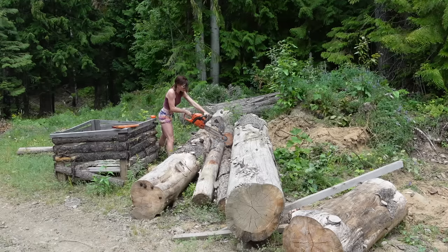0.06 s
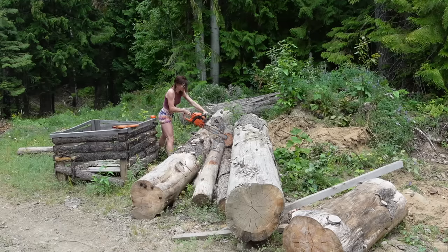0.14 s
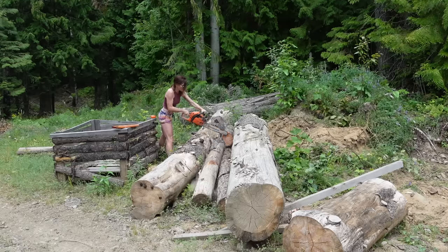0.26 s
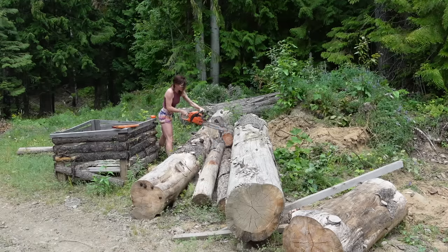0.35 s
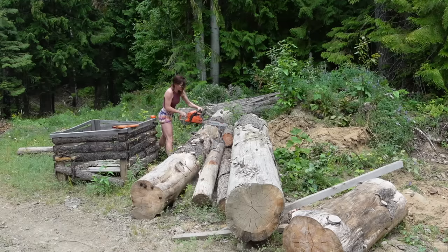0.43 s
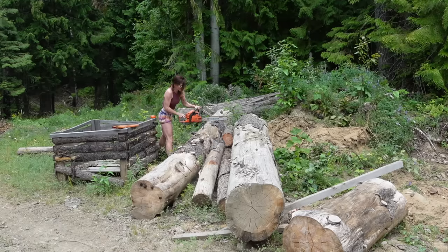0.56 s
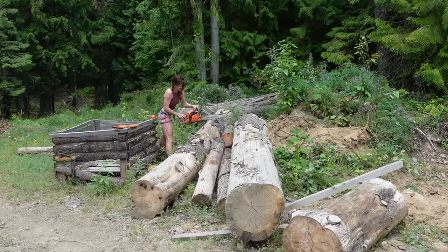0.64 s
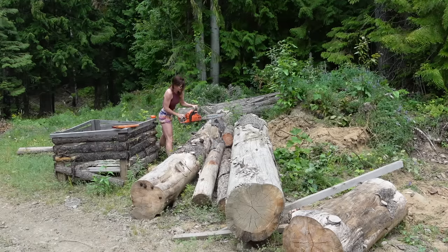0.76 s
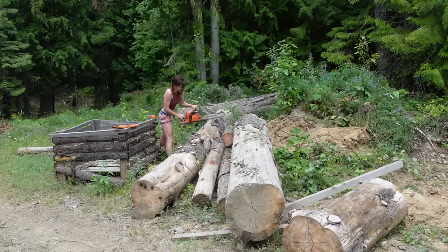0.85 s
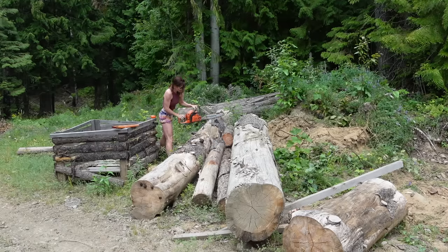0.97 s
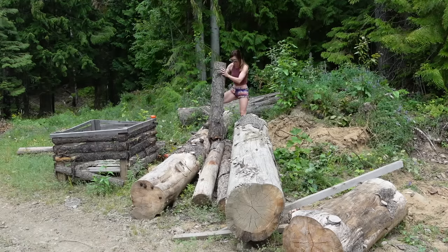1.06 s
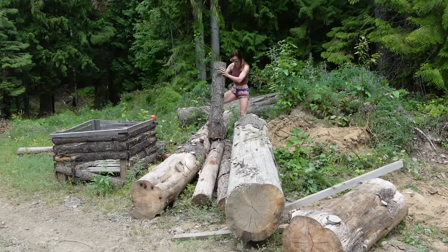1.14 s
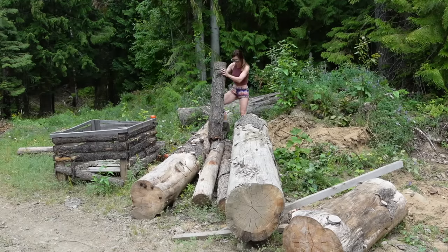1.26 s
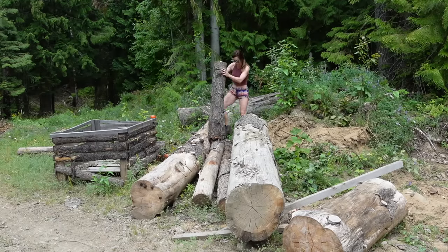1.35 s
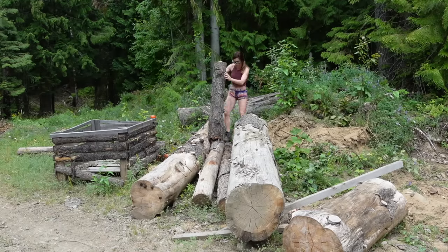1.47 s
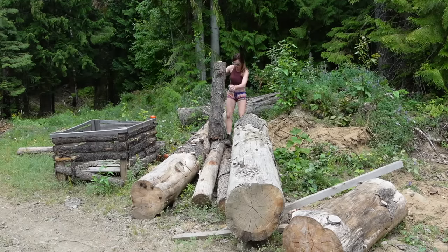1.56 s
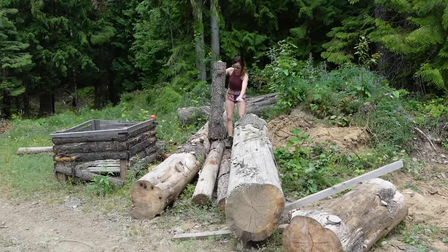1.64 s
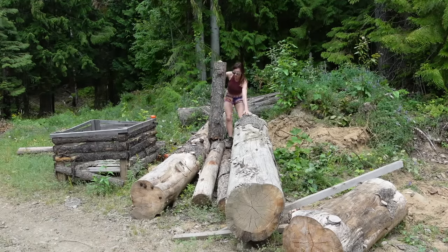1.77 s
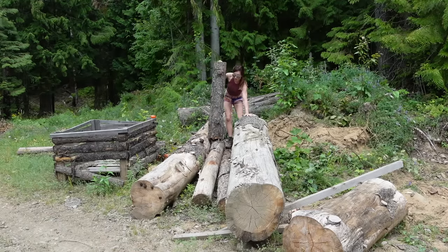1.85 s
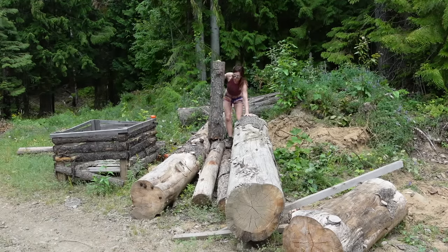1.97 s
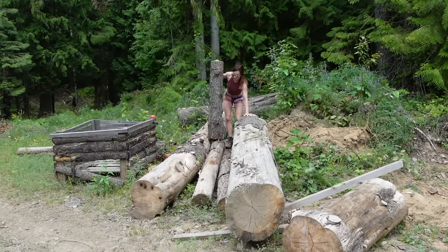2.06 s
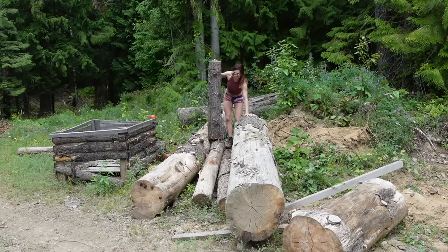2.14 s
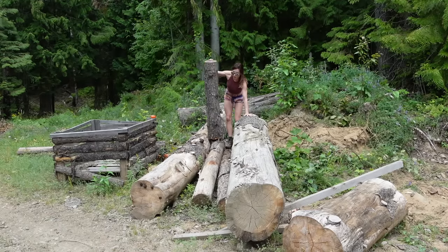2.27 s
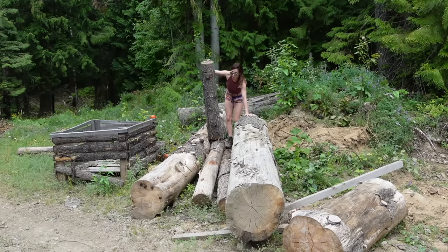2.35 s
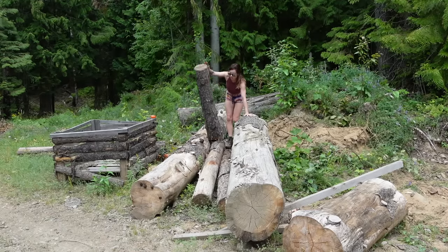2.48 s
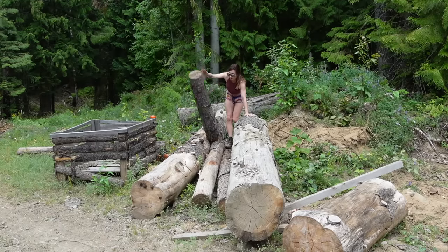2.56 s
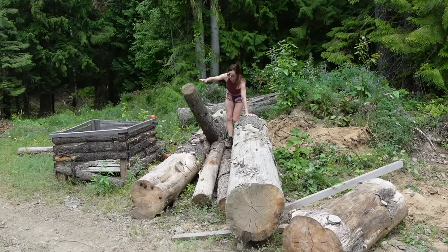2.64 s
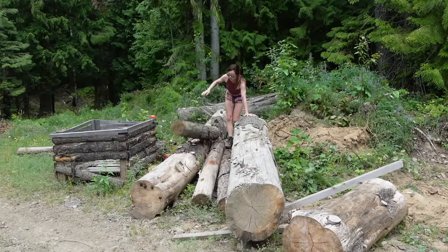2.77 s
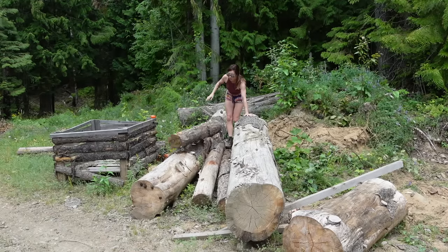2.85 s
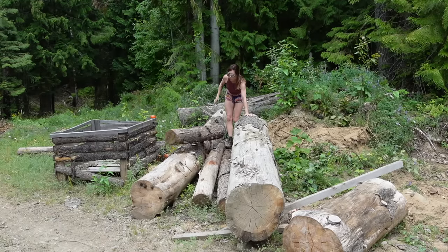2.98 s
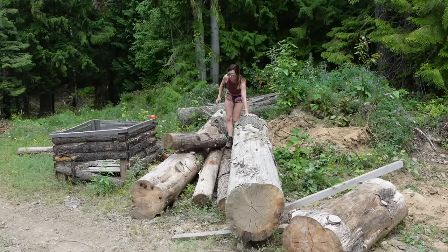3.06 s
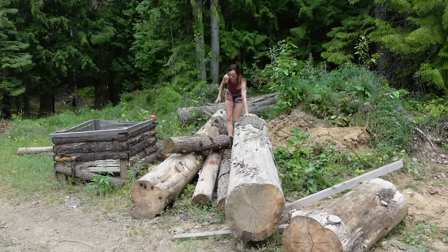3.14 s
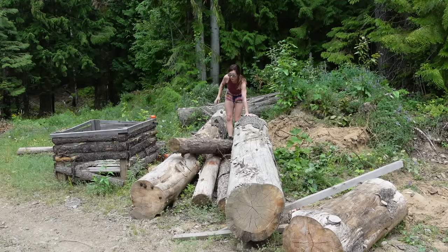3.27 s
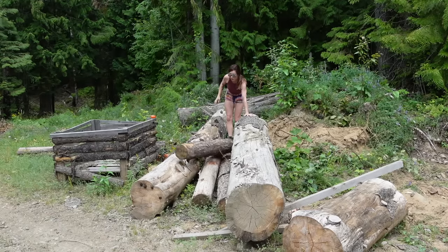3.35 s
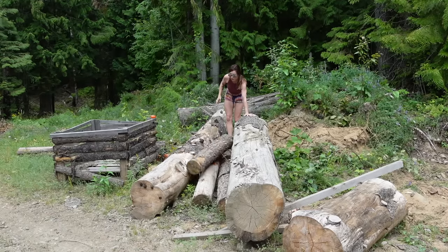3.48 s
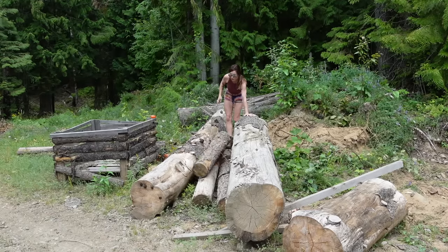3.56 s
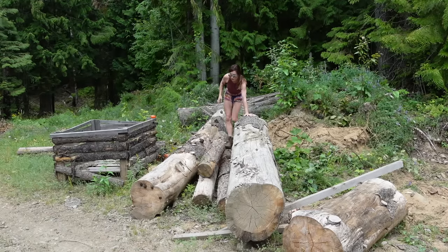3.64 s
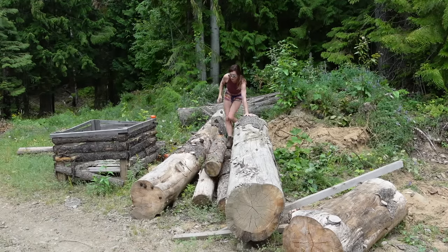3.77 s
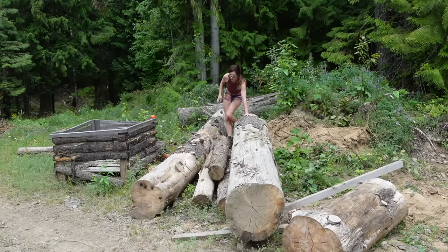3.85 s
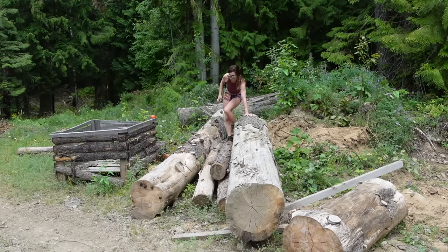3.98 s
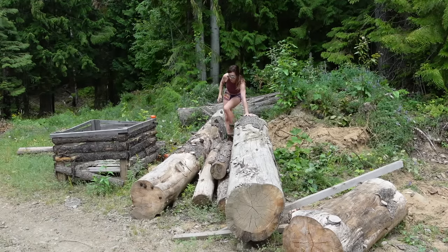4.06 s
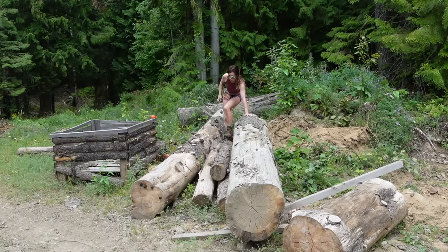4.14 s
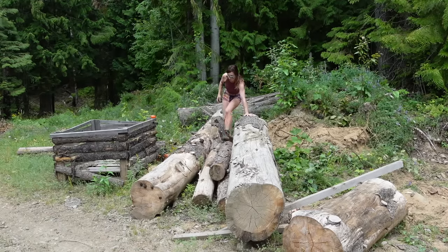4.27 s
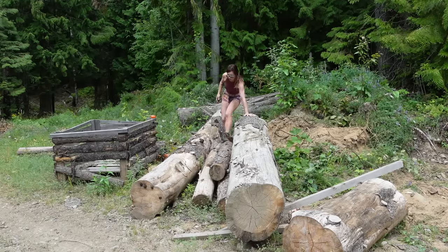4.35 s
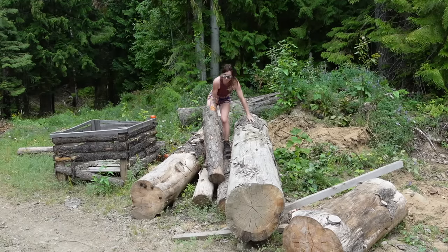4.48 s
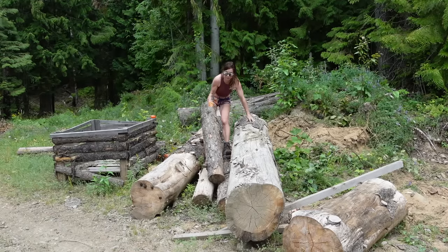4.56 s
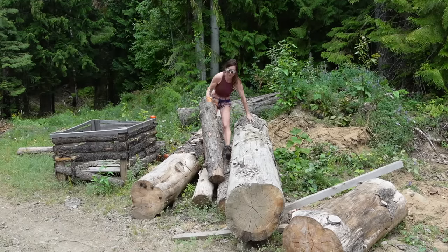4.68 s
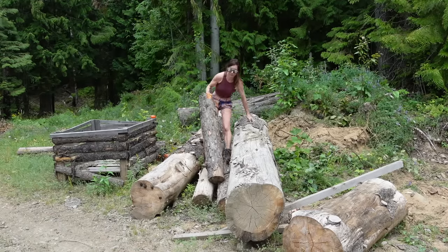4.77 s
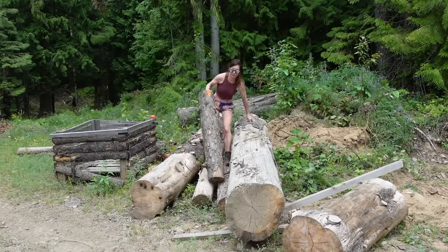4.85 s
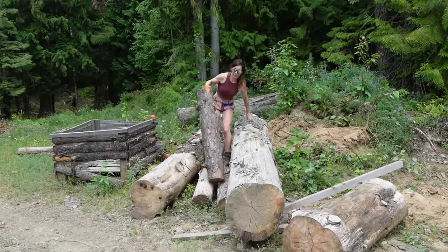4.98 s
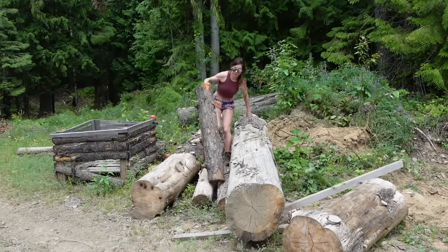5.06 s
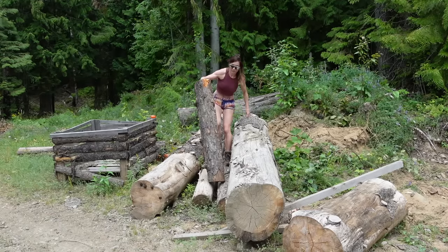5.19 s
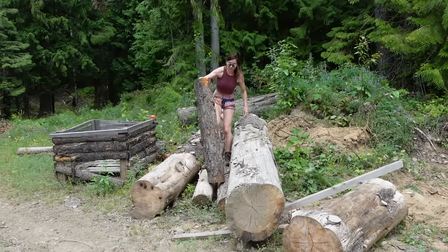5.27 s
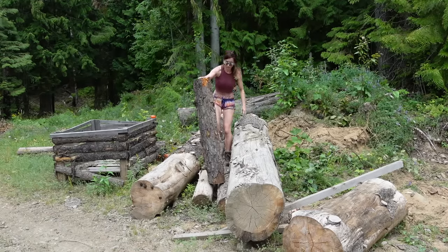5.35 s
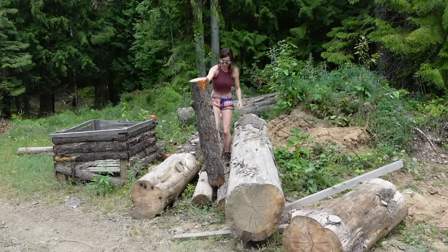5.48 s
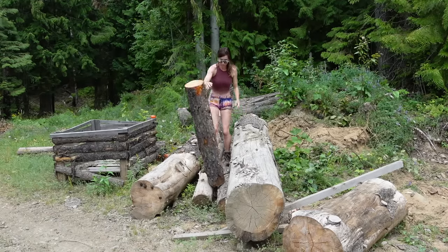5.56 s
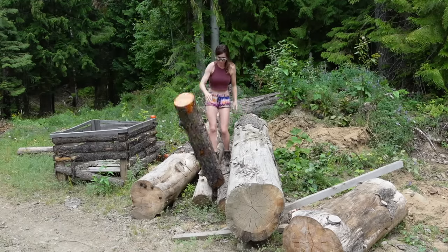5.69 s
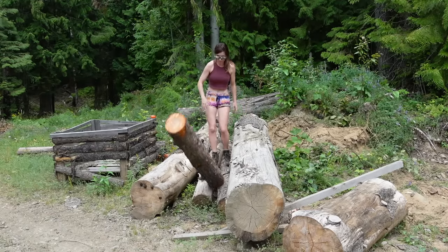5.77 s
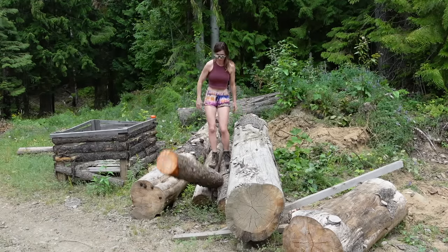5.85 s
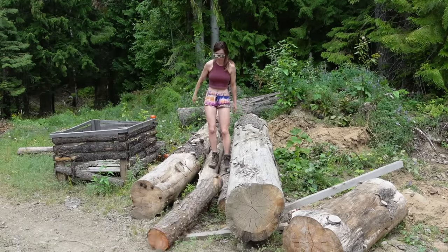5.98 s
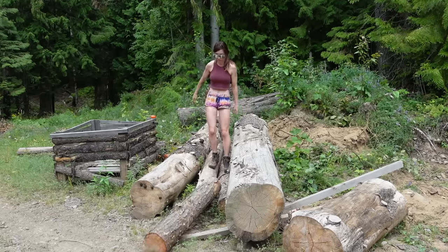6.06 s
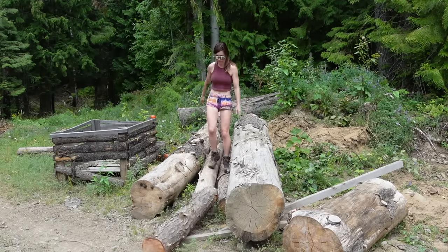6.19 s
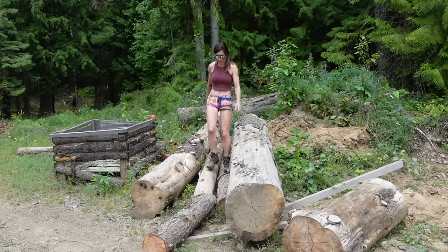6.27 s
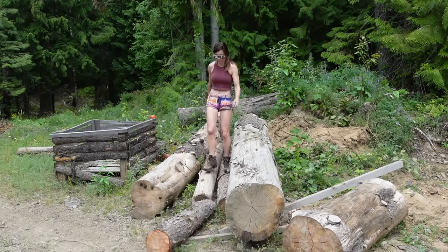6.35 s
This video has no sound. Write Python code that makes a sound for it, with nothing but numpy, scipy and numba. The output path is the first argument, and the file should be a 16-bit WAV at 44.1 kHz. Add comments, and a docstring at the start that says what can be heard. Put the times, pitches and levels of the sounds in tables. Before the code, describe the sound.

Outdoors in a quiet forest clearing, a chainsaw is heard from a few metres away. From 0 to 1.1 seconds it drops from a fast raspy buzz, its pitch and loudness sliding down; chain rattle and whine give way to separate steely clanks and uneven pops. A small kick near 0.97 precedes an abrupt cut at 1.1. Only faint air and tiny bark crackles remain until about 2.65. A log then topples: crunching thuds at 2.8 to 2.9 with a low hollow ring, followed by dense knocks and sharp snaps from 3.1 to 3.7, and smaller bumps and cracks around 3.9 to 4.25. Sparse, light twig snaps and crackling continue from 4.9 to 5.9. At 6.04 the log lands again with the strongest crunch, deep thud and woody resonance, then bark scuffs and brittle snaps run to the end, softly echoed by trees.

```python
"""A chainsaw drops off the throttle in a forest clearing, slows to single clanking strokes until its sound
is cut off: one falling crank speed drives filtered exhaust pops and the rattle, whine and clanks of the chain.
Then a cut log is twice stood on end and toppled down a wood pile: bark crunches as bursts of grainy noise,
the pile thuds with low damped noise, and the log rings with decaying sines.
Boots snap twigs and scuff bark in between; the trees return a soft noise echo over a faint hush of air."""
import sys
import numpy as np
from scipy import signal
from scipy.fft import rfft, irfft
from scipy.io import wavfile
from scipy.ndimage import uniform_filter1d
from numba import njit

SR = 44100
rng = np.random.default_rng(int(sys.argv[2]) if len(sys.argv) > 2 else 0)


def unload_wav(signal):
    """Save mono or channel-first audio to the path in sys.argv[1] as 16-bit WAV at rate SR, clipped to [-1, 1]."""
    wavfile.write(
        sys.argv[1],
        SR,
        np.round(np.clip(np.atleast_2d(signal).T, -1, 1) * 32767).astype(np.int16),
    )


N = 283122
TIME = np.arange(N) / SR
LEFT_RIGHT = np.array([[1], [-1]])  # puts a side signal into two channels


def undb(db):
    """Decibels to gain."""
    return 10 ** (np.asarray(db) / 20)


def unit(x):
    """Scale to rms 1."""
    return x / np.sqrt(np.mean(x ** 2) + 1e-30)


def add(track, s, x):
    """Mix x into the track from time s on."""
    i = int(np.clip(s * SR, 0, N - 1))
    track[i:i + len(x)] += x[:N - i]


def band(x, hz, width):
    """One resonance, gain 1 at its centre."""
    hz = min(hz, .45 * SR)
    w = 2 * np.pi * hz / SR
    a = np.sin(w) * width / hz / 2
    return signal.lfilter([a, 0, -a], [1 + a, -2 * np.cos(w), 1 - a], x)


def band_twice(x, hz, width):
    """Two equal resonances in a row, for steeper sides."""
    return band(band(x, hz, width), hz, width)


@njit
def moving_band(x, hz, width):
    """A resonance whose centre moves."""
    y, b, low = np.empty(len(x)), 0., 0.
    for i in range(len(x)):
        g, k = np.tan(np.pi * hz[i] / SR), width / hz[i]
        v = (b + g * (x[i] + 1e-18 - low)) / (1 + g * (g + k))
        b, low, y[i] = 2 * v - b, low + 2 * g * v, k * v
    return y


def colour(x, points, size=2048):
    """Causal (minimum-phase) filter through (f/Hz, level/dB) points."""
    hz, db = np.transpose(points)
    grid = np.maximum(np.arange(size // 2 + 1) * SR / size, 1)
    cepstrum = irfft(np.log(undb(np.interp(np.log(grid), np.log(hz), db))))
    cepstrum[1:size // 2] *= 2
    cepstrum[size // 2 + 1:] = 0
    return signal.fftconvolve(x, irfft(np.exp(rfft(cepstrum))))[:len(x)]


def grit(count, spread_db, size=12):
    """Noise broken into tiny grains of unequal strength; size is the samples in a grain."""
    grains = undb(spread_db * np.clip(rng.standard_normal(count // size + 1), -2, 2))
    return unit(rng.standard_normal(count) * np.repeat(grains, size)[:count])


def steady(x, size=4400):
    """Even out the slow level and keep the single strokes."""
    power = uniform_filter1d(uniform_filter1d(x ** 2, size), size)
    return x / np.sqrt(np.abs(power) + 1e-12)


# the throttle closes and the saw coasts down; one late firing kicks the crank up again (Hz = turns a second)
FULL_HZ, THROTTLE_OFF_S, COAST_S = 147.6, .04, .655
KICK_S, KICK_HZ = .972, 51.2
LAST_STROKE_S, CUT_OFF_S = 1.0775, 1.096  # last stroke heard, end of the saw's sound


def crank():
    """Turns a second: friction takes the same share of the speed in every instant."""
    coasting = FULL_HZ * np.exp(-np.maximum(TIME - THROTTLE_OFF_S, 0) / COAST_S)
    kicked = KICK_HZ * np.exp(-(np.minimum(TIME, CUT_OFF_S) - KICK_S) / COAST_S)
    return np.where(TIME < KICK_S, coasting, kicked)


GAS_DB = -15  # rush of gas with each pop at full speed
STUMBLE_DB = 3.2  # pops grow uneven as the engine slows: scatter at the speed of the late firing
# muffler resonances at 80 turns a second: f/Hz, nominal width/Hz, level/dB,
# power by which hotter, faster gas raises the pitch
MUFFLER_MODES = [(192, 55, -3, 0), (430, 200, -4, .26), (625, 190, 0, .36), (1000, 200, -18, .1)]


def exhaust(turns, hz, pop_lag=0.36, rise_db=5, port_db=-16):
    """One pop and rush of gas per crank turn, a little after the piston's jerk, rings the muffler."""
    wraps = np.floor(turns - pop_lag)
    stumble = (KICK_HZ / hz) ** 2 * np.clip(rng.standard_normal(N), -2, 1)
    pops = np.diff(wraps, prepend=wraps[0]) * undb(STUMBLE_DB * stumble)
    rush = unit(np.exp(-2 * ((turns - pop_lag) % 1)) * rng.standard_normal(N))
    pops = pops + undb(GAS_DB) * (hz / FULL_HZ) ** 2 * np.sqrt(hz / SR) * rush
    # the port hums at speed
    out = undb(port_db) * band(band(pops, 120, 60), 190, 60) * (hz / 150) ** 2
    for k, (f, width, db, heat) in enumerate(MUFFLER_MODES):
        centre = f * (hz / 80) ** heat
        ring = moving_band(moving_band(pops, centre, 1.5 * width), centre, 1.5 * width)
        # faster gas drives the upper resonances harder
        drive_db = rise_db * np.log2(hz / 80) * np.log2(max(f, 300) / 480)
        out = out + (-1) ** k * undb(db + drive_db) * ring
    return steady(signal.sosfilt(signal.butter(4, 110, "high", fs=SR, output="sos"), out))


# howling crank orders: order, crank speed at the peak f/Hz, width of that speed range/Hz, level/dB
HOUSING_HOWLS = [(4, 147, 8, -1), (6, 124, 6.9, 2), (7, 103, 5.8, -1), (14, 76, 6.9, 15.5)]


def howl(pops, hz):
    """Exhaust orders swell and fade as the falling speed sweeps through resonances of the housing."""
    out = 0
    for order, speed, width, db in HOUSING_HOWLS:
        swell = 1 / (1 + ((hz - speed) / width) ** 2)
        out = out + undb(db) * moving_band(pops, round(order) * hz, speed / 2) * swell
    return out


# ringing of clutch drum and bar: f/Hz, width/Hz, level/dB at 56 turns a second, gain/dB per doubling of speed
STEEL_MODES = [(2518, 63, 7, -5), (3094, 59, 6, 8), (4840, 80, -1.5, -11), (5390, 150, 0.5, 8),
               (6370, 160, 1, 9), (6830, 120, -3, 13), (8000, 230, -8, -4), (10050, 540, -10.5, 15),
               (12840, 420, -10.5, 13)]
# tone of one clank of the clutch: f/Hz, level/dB
CLANK_TONE = [(50, -14), (200, 0.5), (1000, -2.5), (1900, -9), (2400, -12), (5000, 1.5), (8500, -30),
              (15000, -35)]
# tone of the chain rattling in its groove: f/Hz, level/dB
CHAIN_TONE = [(60, -49), (200, -41), (700, 4), (1150, -5), (1600, -0.5), (2100, -3), (3200, 3),
              (4200, -4.5), (6800, -5), (8500, -10.5), (15000, -17)]


def clatter(turns, hz, clank_s=0.0028, loose_hz=68, scatter_db=2.0, whine_hz=106, whine_db=-6,
            steel_db=0, clank_db=-5, rattle_db=3):
    """At speed the chain rattles and whines; as it slows, single clanks ring clutch drum and bar."""
    stroke = (np.floor(turns) - np.floor(turns[0])).astype(int)
    running = 1 / (1 + (loose_hz / hz) ** 2.9)  # near 1 at speed, falling as it slows
    jerks = np.exp(-(turns % 1 / hz) / clank_s) * undb(scatter_db * rng.standard_normal(N)[stroke])
    knocks = (jerks + .5 * running + 0.004) * grit(N, 3.3)
    doublings = np.minimum(np.log2(hz / 56), .25)
    modes = sum(undb(db + gain_db * doublings) * band(knocks, f, width)
                for f, width, db, gain_db in STEEL_MODES)
    steel = steady(modes) * (1 - 0.65 * running)
    clanks = steady(colour(knocks, CLANK_TONE)) * (1 - running)
    rattle = steady(colour((1 + .5 * jerks) * grit(N, 0.8), CHAIN_TONE)) * running
    # links pass the sprocket unevenly, and sing out as the speed sweeps through a resonance of the chain
    slow = signal.butter(2, 35, fs=SR, output="sos")
    uneven = unit(signal.sosfilt(slow, rng.standard_normal(N)))
    orders = np.sin(2 * np.pi * 14 * turns) + np.sin(2 * np.pi * 16 * turns)
    whine = (1 + .5 * uneven) * orders / (1 + ((hz - whine_hz) / 11) ** 2)
    metal = undb(steel_db) * steel + undb(clank_db) * clanks + undb(rattle_db) * rattle
    return steady(metal) + undb(whine_db) * whine


# echo of the trees: f/Hz, level/dB, t60/s
FOREST_ECHO = [(119, -5, 0.75), (430, -5.5, 1), (1003, -10.5, 0.78), (2134, -9.5, 0.74), (4530, -14, 0.9),
               (9200, -17, 0.41), (14000, -23, 0.49)]


def forest(x, spread=0.072, build_s=0.005, grain_db=2.5, count=44100):
    """Countless trunks and twigs scatter the sound: their returns add up in power to a fine rustle."""
    t, echo = np.arange(count) / SR, 0
    scatter = grit(N, grain_db, size=40) + spread * rng.standard_normal(N) * LEFT_RIGHT
    for hz, db, t60 in FOREST_ECHO:
        fade = ((1 - np.exp(-t / build_s)) * np.exp(-np.log(1000) * t / t60)) ** 2
        sent = band_twice(x, hz, 0.98 * hz) ** 2
        power = signal.fftconvolve(sent, fade / fade.sum())[:N]
        rustle = unit(band_twice(scatter, hz, 1.63 * hz))
        echo = echo + undb(db) * np.sqrt(np.abs(power)) * rustle
    return echo


# loudness follows speed: level at full speed, loss per halving of speed, gain from the late firing (all dB)
EXHAUST_DB, EXHAUST_FALL_DB, EXHAUST_KICK_DB = -32, 7.5, 1.5
CLATTER_DB, CLATTER_FALL_DB, CLATTER_KICK_DB = -25, 7.5, -0.4


def chainsaw(echo_db=-5):
    """The crank coasts down and drives both exhaust and chain; the trees return the clatter."""
    hz = crank()
    halvings, kicked = np.log2(FULL_HZ / hz), TIME >= KICK_S
    exhaust_db = EXHAUST_DB - EXHAUST_FALL_DB * halvings + EXHAUST_KICK_DB * kicked
    clatter_db = CLATTER_DB - CLATTER_FALL_DB * halvings + CLATTER_KICK_DB * kicked
    turns = np.cumsum(hz) / SR
    turns -= np.interp(LAST_STROKE_S, TIME, turns)  # a stroke falls on the last-stroke time
    pops = exhaust(turns, hz)
    engine = undb(exhaust_db) * (pops + howl(pops, hz))
    metal = undb(clatter_db) * clatter(turns, hz)
    audible = np.clip((CUT_OFF_S - TIME) / 0.0038, 0, 1)  # saw and echo are cut off together
    return audible * (engine + metal + undb(echo_db) * forest(metal))


AIR_DB = -60.5
# tone of still forest air: f/Hz, level/dB
AIR_TONE = [(18, -41), (30, -33), (92, -6), (173, 2), (350, -5), (1400, -13), (1550, -14.5), (1910, -13.5),
            (2180, -20), (2620, -16.5), (4660, -21), (10200, -24), (15500, -27.5)]


def air(spread=0.42):
    """A faint, even hush of the woods from filtered noise."""
    mid, side = (unit(colour(rng.standard_normal(N), AIR_TONE)) for _ in range(2))
    return undb(AIR_DB) * (mid + spread * side * LEFT_RIGHT)


GIVE_S = .005  # crushed bark gives for a moment before the wood takes the blow
THUD_HZ, THUD_DB_PER_OCTAVE = 141.6, 60.5  # pitch of a full-weight thud; lighter blows sound higher
FULL_THUD_DB, THUMP_HZ = -18.5, 184
# the log lands or bounces: t/s, crunch length/s, crunch level/dB, splinter f/Hz, thud level/dB,
# log ring level/dB before gain and tilt, log ring t60/s; crunches() and log_ring() play it too
LOG_BLOWS = [(2.654, 0.0025, -30.5, 770, -64, -44.5, 0.14), (2.829, 0.011, -20, 1990, -34.5, -41.5, 0.69),
             (2.881, 0.0082, -14.5, 1510, -25.5, -27, 0.44), (3.132, 0.0073, -15, 3700, -32, -38.5, 0.37),
             (3.345, 0.0094, -29, 1460, -36, -43.5, 0.097), (3.505, 0.0096, -20, 2160, -36, -40, 0.17),
             (3.656, 0.0053, -21, 4160, -53, -54, 0.3), (3.853, 0.0058, -24, 1280, -50, -57, .26),
             (3.954, 0.016, -31, 2200, -35, -38, 0.29), (4.0418, 0.0042, -15, 3130, -46, -57, .2),
             (5.992, 0.0073, -22, 2650, -42.5, -38.5, 0.24), (6.04, 0.0062, -10, 1830, -24, -14.5, .35)]
# soft thumps with no ring, such as a boot set down: t/s, level/dB
SOFT_THUMPS = [(0.087, -34), (4.899, -53.5), (5.442, -50.5)]


def thuds(thud_s=0.026, knock_db=-11, count=16384):
    """The pile takes each blow with a dead thud and a short shudder."""
    out, t = np.zeros(N), np.arange(count) / SR
    heavy = [(s + GIVE_S, db, THUD_HZ * 2 ** ((FULL_THUD_DB - db) / THUD_DB_PER_OCTAVE))
             for s, _, _, _, db, _, _ in LOG_BLOWS]
    soft = [(s, db, THUMP_HZ) for s, db in SOFT_THUMPS]
    onset = 1 - np.exp(-t / .004)
    for s, db, hz in heavy + soft:
        push = onset * np.exp(-t / thud_s) * rng.standard_normal(count)
        shudder = band(band(push, 0.89 * hz, 0.91 * hz), hz, 1.65 * hz)
        bump = np.sin(2 * np.pi * hz * t) * onset * np.exp(-t / 0.0075)
        knock = band(push * np.exp(-t / 0.06), 670, 700)
        thud = unit(unit(shudder) + 0.59 * unit(bump) + undb(knock_db) * unit(knock))
        add(out, s, undb(db) * thud * np.sqrt(thud_s * SR / count))
    return out


# thick wood rings lower and has more body: pitch of a middling splinter, body gained per octave below it
SPLINTER_HZ, BODY_DB_PER_OCTAVE = 2500, 7
# a clean break rings more than a long crush: length of a middling crack, ring gained per halving of it
CRACK_S, RING_DB_PER_HALVING = 0.0036, 3.5
# tone of breaking bark: f/Hz, level/dB
BARK_TONE = [(40, -6), (120, -14.5), (450, -14.5), (750, -6), (1050, 0.5), (1700, 2), (3400, 4), (6000, 3),
             (10000, 2.5), (15500, -9.5)]


def cracks(events, grain_db=5, fade_s=0.0012, crumbs_db=-21, crumbs_s=0.032, splinter_db=3, count=4096):
    """Bark gives a little, then its fibres break in a quick volley; a splinter rings and a few crumbs follow."""
    lead_s = .012  # room for the bark to give before the break
    out, t = np.zeros(N), np.arange(count) / SR - lead_s
    for s, length, db, splinter_hz, treble_db in events:
        after = np.maximum(t - 1.36 * length, 0)
        fade = np.exp(-after / fade_s) + undb(crumbs_db) * np.exp(-after / crumbs_s)
        force = np.clip(t / (0.043 * length), 0, 1) * fade
        crush = undb(-17) * min(length / .008, 1) ** 2 * np.exp(-np.abs(t) / .0025)
        fibres = (force + crush) * grit(count, grain_db, size=6)
        ring_db = splinter_db + RING_DB_PER_HALVING * np.log2(CRACK_S / length)
        fibres = fibres + undb(ring_db) * band(fibres, splinter_hz, splinter_hz / 7)
        body_db = BODY_DB_PER_OCTAVE * np.log2(SPLINTER_HZ / max(splinter_hz, 1700))
        tone = [(1500, body_db), (2800, 0.018), (5500, 0.017), (9500, treble_db)]
        burst = colour(colour(fibres, BARK_TONE), tone)
        add(out, s - lead_s, undb(db) * unit(burst) * np.sqrt(length * SR / count))
    return out


# the clearest snaps of twigs and bark: t/s, length/s, level/dB, splinter f/Hz, treble level/dB
CLEAR_SNAPS = [(1.1488, 0.0015, -35, 1220, -2.5), (1.6715, 0.0028, -44.5, 2470, 11),
               (1.689, 0.0091, -45, 1310, -4), (1.908, 0.0045, -51, 900, -14),
               (2.397, .0012, -44.5, 3960, 17), (2.666, 0.001, -34.5, 1500, -11),
               (3.148, 0.0078, -22, 2600, -8), (3.16, 0.0044, -17.5, 3450, -6.5),
               (3.223, 0.001, -11, 3340, -23), (3.2542, 0.00072, -23, 5440, 6),
               (3.288, 0.0067, -22.5, 1800, -1), (3.336, 0.0026, -24, 1250, -11),
               (3.398, 0.0019, -29.5, 3480, 0), (3.4911, 0.0018, -24, 2720, -12),
               (3.4965, 0.0014, -13.5, 1690, -1.5), (4.1524, 0.0018, -24.5, 2880, -9),
               (4.253, 0.0082, -27.5, 3000, -0.5), (4.896, 0.0034, -36.5, 4270, -4.5),
               (5.0602, 0.0018, -30, 4900, 14.5), (5.1917, 0.0011, -32, 5750, 3),
               (5.65, 0.0018, -36.5, 2800, 3), (5.6728, 0.0014, -37.5, 4100, -3),
               (5.891, 0.00087, -25.5, 3000, 15), (5.972, 0.0013, -25, 4560, -6),
               (5.981, 0.0043, -26.5, 4300, 5), (6.218, 0.0058, -26.5, 2450, -3),
               (6.2847, 0.00049, -16.5, 6000, 4), (6.388, 0.0013, -31, 6000, 3),
               (6.414, 0.0043, -25.5, 2900, 7)]


def snaps():
    """Twigs and bark break one by one, each ringing a splinter."""
    return cracks(CLEAR_SNAPS)


SCUFF_WIDTH = 3.9  # bandwidth over centre
# boots and sliding bark: t/s, length/s, level/dB, centre f/Hz
BARK_SCUFFS = [(1.56, 0.42, -64.5, 2420), (2.79, 0.034, -45.5, 3600), (3.159, 0.16, -58, 2970),
               (4.01, 0.041, -36.5, 2500), (5.061, 0.29, -65, 10100), (5.863, 0.11, -52, 6640),
               (5.932, 0.047, -45.5, 6040), (6.039, 0.13, -35, 3900), (6.167, 0.077, -34.5, 3000),
               (6.17, 0.22, -41.5, 556), (6.257, 0.073, -42, 2860), (6.36, 0.29, -46.5, 5900)]


def scuffs(grain_db=2.5):
    """Dry bark and litter rub past each other in short swells."""
    out = np.zeros(N)
    for s, length, db, hz in BARK_SCUFFS:
        count = int(length * SR)
        swell = np.sin(np.pi * (np.arange(count) + .5) / count) ** 0.15
        rub = band_twice(grit(N // 8, grain_db, size=30)[:count], hz, SCUFF_WIDTH * hz)
        add(out, s, undb(db) * unit(swell * rub))
    return out


CRACKLE_LENGTH_S, CRACKLE_SCATTER_DB = 0.0016, 4
# bark crumbles while the log is shifted or rolls: t/s, length/s, snaps a second, middling level/dB,
# middling splinter f/Hz, treble level/dB
BARK_CRACKLE = [(1.566, .32, 24, -51.5, 1680, 8), (2.225, .17, 8.8, -47.5, 2680, 4.5),
                (3.184, .04, 89, -31.5, 2880, 9), (3.262, .02, 130, -26, 2900, -5),
                (4.012, .03, 130, -27, 2500, -6.5), (5.229, .27, 19, -43, 4950, -0.5),
                (5.614, .13, 22.5, -40, 3920, -1), (6.057, .3, 30, -31, 1990, -5)]


def crackle(spread_octaves=0.46, count=16):
    """Small snaps follow each other at uneven gaps, each with its own strength and pitch."""
    events = []
    for start, length, rate, db, hz, treble_db in BARK_CRACKLE:
        delays = (np.arange(count) + rng.random(count)) / rate
        for delay, (strength, pitch) in zip(delays, rng.standard_normal((count, 2))):
            snap_db = db + CRACKLE_SCATTER_DB * strength
            snap_hz = hz * 2 ** (spread_octaves * pitch)
            if delay < length:
                events.append((start + delay, CRACKLE_LENGTH_S, snap_db, snap_hz, treble_db))
    return cracks(events)


CRUNCH_TREBLE_DB = -5  # crushed bark is dull


def crunches():
    """Every blow of the log first crushes its bark."""
    return cracks([(s, length, db, hz, CRUNCH_TREBLE_DB) for s, length, db, hz, *_ in LOG_BLOWS])


# bending modes of the log: f/Hz, level/dB, share of the ring time
LOG_MODES = [(378, -5, 0.92), (593, -21, 0.59), (759, -2.5, 0.13), (1114, -3, 0.19), (1427, -9, 0.42)]


def log_ring(swell_s=0.016, ring_gain_db=11.0, tap_tilt=0.32, count=32768):
    """The log rings up as it springs free after each blow; light taps ring brighter."""
    out, t = np.zeros(N), np.arange(count) / SR
    for s, *_, ring_db, t60 in LOG_BLOWS:
        tilt_db = tap_tilt * np.clip(-41 - ring_db, -15, 20)  # per octave above the lowest mode
        for hz, db, share in LOG_MODES:
            decay = np.exp(-np.log(1000) * t / (share * t60))
            mode = np.sin(2 * np.pi * (hz * t + rng.random())) * decay
            gain = undb(ring_db + ring_gain_db + db + tilt_db * np.log2(hz / LOG_MODES[0][0]))
            add(out, s + GIVE_S, gain * mode * (1 - np.exp(-t / swell_s)))
    return out


def scene(aside_s=.004):
    """Saw and wood pile stand straight ahead; nearby logs add a faint sideways reflection."""
    saw, hush = chainsaw(), air()
    wood = thuds() + snaps() + scuffs() + crackle() + crunches()
    ahead = saw + wood + log_ring() + forest(wood)
    late = np.interp(TIME - aside_s, TIME, ahead.mean(axis=0), left=0)
    aside = colour(late, [(300, -33), (1000, -26), (8000, -24)])
    return ahead + aside * LEFT_RIGHT + hush


TOP_HZ = 16000


def record(dry):
    """The microphone sheds the deepest bass, rounds the sharpest peaks and cuts the very top."""
    thin = signal.sosfilt(signal.butter(3, 50, "high", fs=SR, output="sos"), dry)
    rounded = .75 * np.tanh(thin / .75)
    return signal.sosfilt(signal.ellip(8, .2, 70, TOP_HZ, fs=SR, output="sos"), rounded)


dry = scene()
out = record(dry)
unload_wav(out)
```